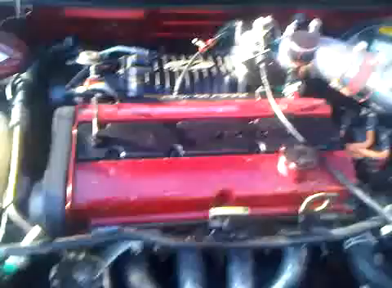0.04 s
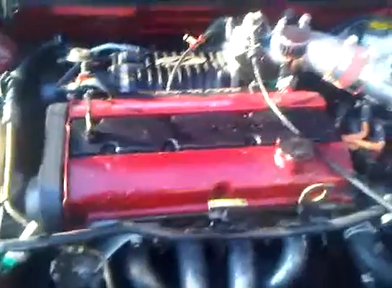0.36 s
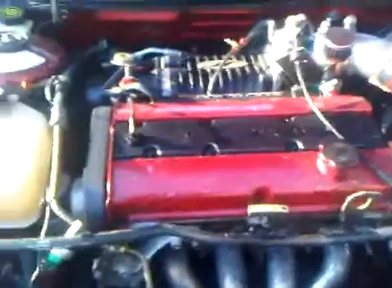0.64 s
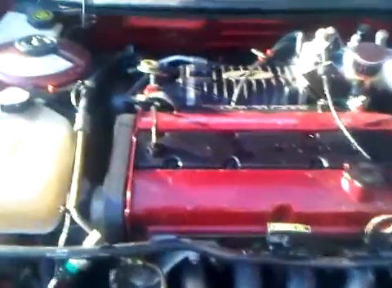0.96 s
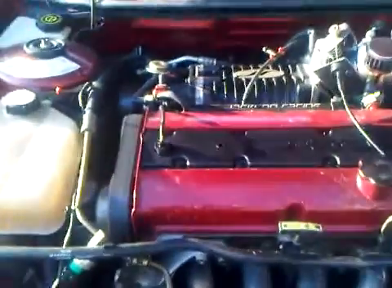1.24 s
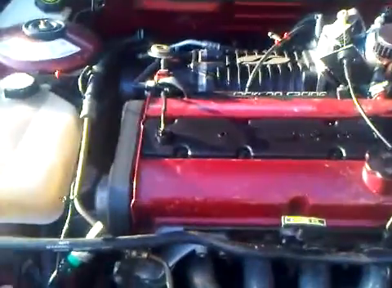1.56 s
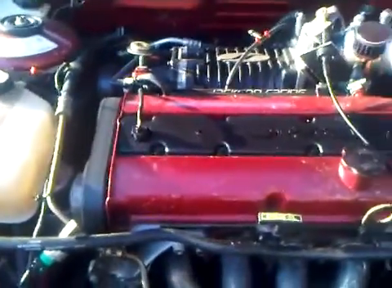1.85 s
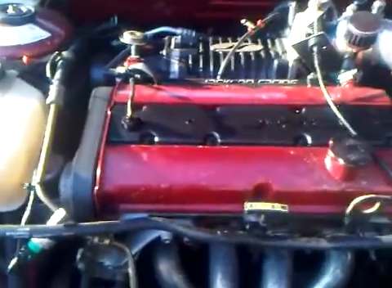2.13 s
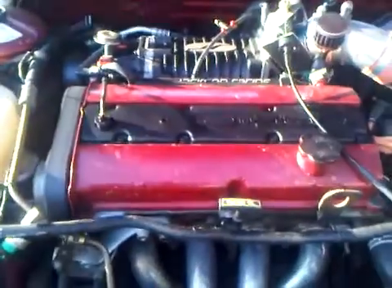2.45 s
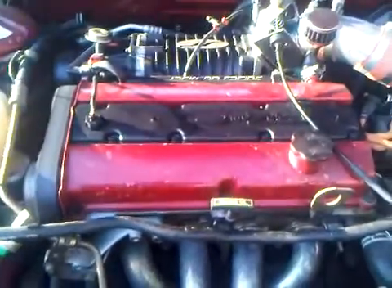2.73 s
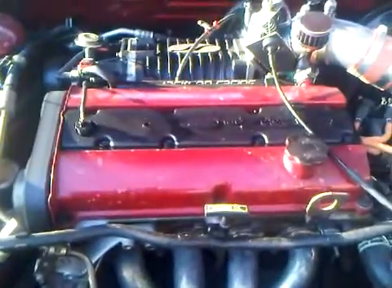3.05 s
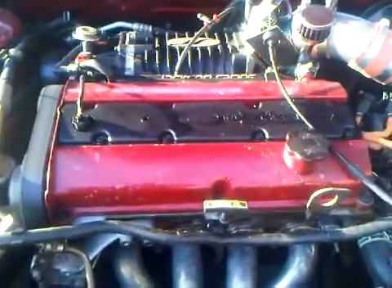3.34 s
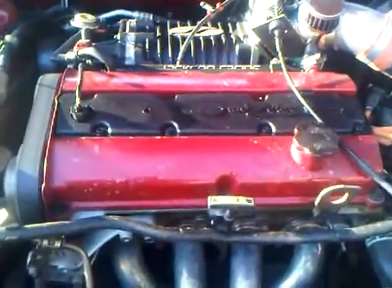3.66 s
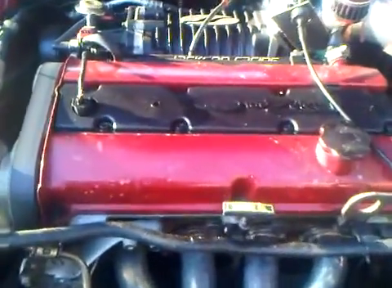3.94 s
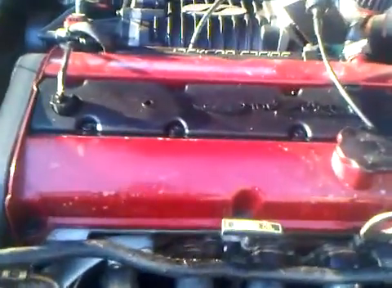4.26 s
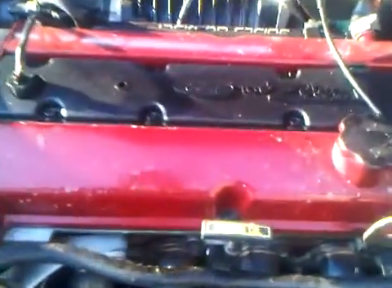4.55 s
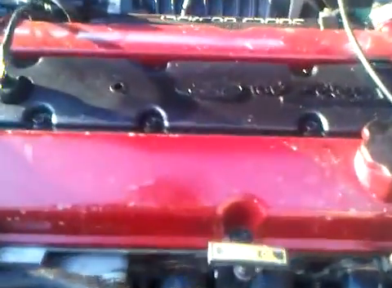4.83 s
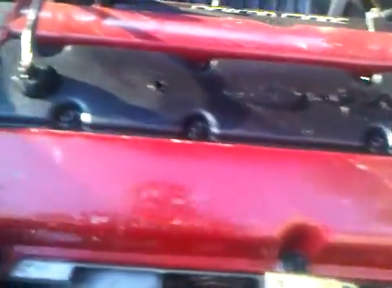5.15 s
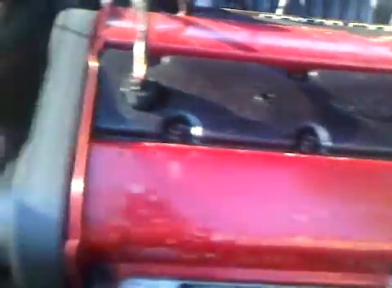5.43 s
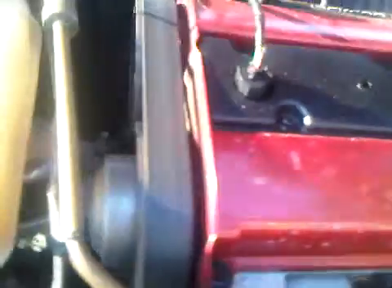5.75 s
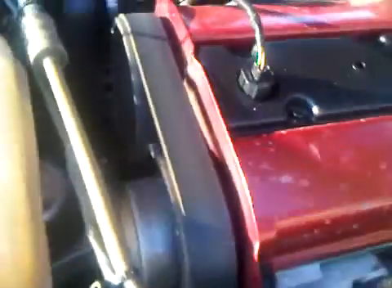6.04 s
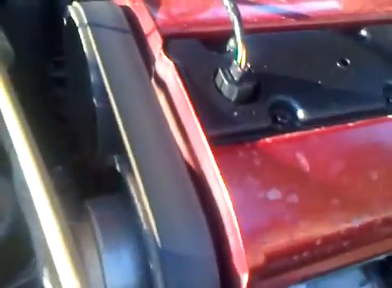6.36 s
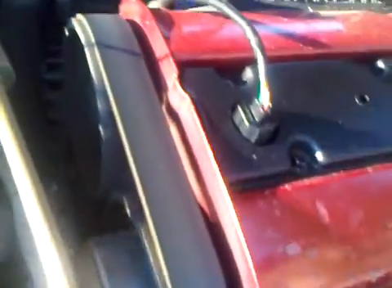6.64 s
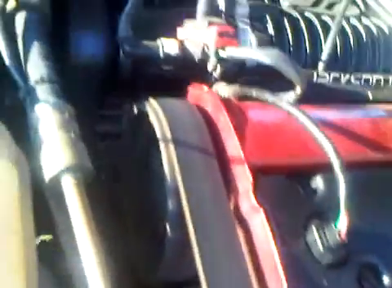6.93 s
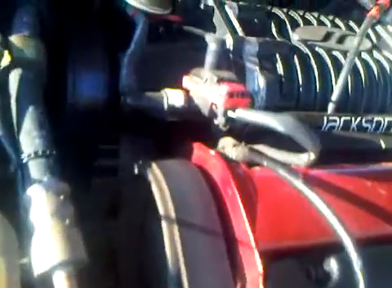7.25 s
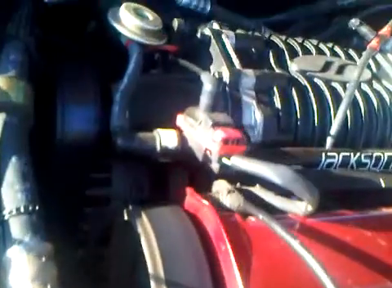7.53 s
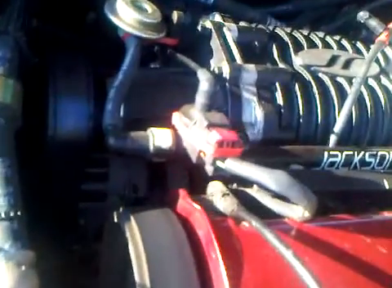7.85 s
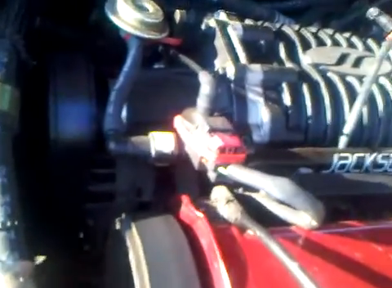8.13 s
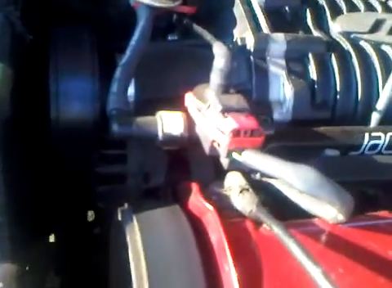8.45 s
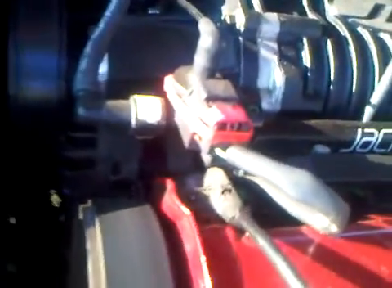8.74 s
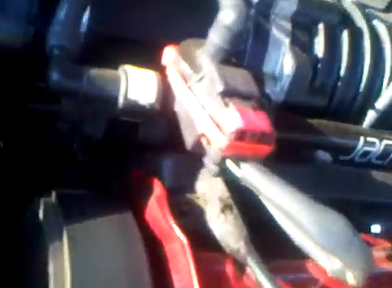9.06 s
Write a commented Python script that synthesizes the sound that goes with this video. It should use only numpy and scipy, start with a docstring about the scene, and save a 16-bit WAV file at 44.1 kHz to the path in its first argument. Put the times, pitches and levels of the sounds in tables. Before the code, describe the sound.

At about 0.2 seconds the microphone comes on with a low pop, followed at 0.3 seconds by one sharp snap. From the pop onward, a four-cylinder petrol engine idles close by, outdoors with the bonnet open, its speed wavering only slightly. Valve ticks and clacks repeat in a fast, regular pattern, mixed with small knocks, soft thuds and short dry belt slaps. Underneath are a low firing hum and the rush and whirr of belts and pulleys. The sound is bright at first and turns abruptly a little duller at about 2.5 seconds. The microphone stays over the cam cover until around 4 seconds, then moves to the belt end by about 7 seconds. The hum shifts in tone, the fine ticking softens, and the whirring, clacks and slaps grow stronger. The idle continues until the end at about 9 seconds.

```python
"""A pop and a sharp snap as the microphone comes on, then a four-cylinder petrol engine idling at
about 940 rpm, outdoors with the bonnet open. Impacts in the valve gear excite damped resonances, so
ticks and clacks come in the same order in every cycle, among knocks, thuds and belt slaps. Beneath
them the periodic firing hums, and belt friction rushes and sets pulleys and covers whirring.
The microphone hovers over the cam cover, then moves to the belt end."""
import sys
import numpy as np
from scipy import signal
from scipy.fft import rfft, irfft, next_fast_len
from scipy.io import wavfile
from scipy.ndimage import uniform_filter1d

SR = 44100
rng = np.random.default_rng(int(sys.argv[2]) if len(sys.argv) > 2 else 0)


def dump(signal):
    """Clip the signal to [-1, 1] and save it as 16-bit WAV at the path in sys.argv[1]."""
    limited = np.clip(np.atleast_2d(signal).T, -1, 1)
    pcm = np.round(limited * 32767).astype(np.int16)
    wavfile.write(sys.argv[1], SR, pcm)


N = 400869
TIME = np.arange(N) / SR

# crankshaft speed, hunting a little at idle: time_s, speed_rpm
IDLE_SPEED = [(0, 936.5), (.64, 934.6), (1.43, 945.4), (2.1, 931.3), (2.89, 941.9), (3.43, 935.3),
              (4.39, 948.4), (4.54, 932.7), (5.63, 923.2), (5.9, 943.4), (6.73, 935.5), (7.24, 950.7),
              (8.25, 932.8), (9.09, 945.1)]
# valve strokes of each cylinder in turn: tick_db, tick_tilt_db_per_octave, clack_db
VALVE_STROKES = [(3.5, 8.5, 0.5), (-1, -2.5, -12), (2.5, 2, -5.5), (0, -7.5, -13)]
# Cover and belt levels hold over the cam cover and at the belt end respectively.
# modes of each kind of impact: pitch_hz, width_hz, decay_s, cover_db, belt_db
TICK_RING = [(4330, 560, 0.0032, -40, -45.5), (5300, 810, 0.0032, -47, -50),
             (6700, 2900, 0.002, -42.5, -51)]
BOUNCE_RING = [(5370, 800, 0.0019, -33.5, -46.5)]
CLACK_RING = [(1860, 800, 0.012, -43, -41.5), (2354, 330, 0.011, -49.5, -40.5),
              (3790, 380, 0.0088, -47.5, -38), (4430, 1700, 0.0079, -45, -39)]
THUD_RING = [(148.7, 35, 0.013, -48.5, -56)]
SLAP_RING = [(2000, 1100, 0.0049, -46, -35.5)]
# knocks of block and covers in each cycle: start_s, pitch_hz, width_hz, decay_s, cover_db, belt_db
BLOCK_KNOCKS = [(.0155, 1006, 250, .005, -39.5, -47), (0.0177, 1300, 166, 0.0077, -43.5, -30),
                (0.0231, 1270, 199, .0034, -32.5, -49.5), (.0374, 4640, 110, 0.0058, -69.5, -33.5),
                (.0712, 959, 120, .014, -44, -38.5), (0.117, 318, 51.2, 0.0094, -54.5, -40)]
# belt slaps in each cycle: start_s, level_db
BELT_SLAPS = [(.0092, 1), (0.0422, -5.5), (0.06, 0.5), (.0725, 3.5), (0.124, -3)]
# harmonics of the cam speed in the firing hum: multiple, cover_db, belt_db
HUM_HARMONICS = [(8, -60, -58.5), (12, -62, -62.5), (16, -59, -63), (18, -66, -62), (20, -57.5, -61),
                 (24, -71, -69.5), (36, -71, -68), (40, -62, -55.5), (44, -70.5, -62.5), (48, -68.5, -58.5),
                 (56, -67, -67.5), (60, -63.5, -64.5), (76, -64, -58.5)]
# standing waves in the bay, passed by the microphone: centre_s, half_length_s, multiple, gain_db
STANDING_WAVES = [(4.2, 0.27, 16, 4.5), (4.2, 0.23, 20, -12), (5.397, 0.46, 20, 3), (5.4, 0.56, 40, 6.5),
                  (6.696, 0.63, 56, 7), (7.2, 0.27, 20, -6)]
# noise spectrum of belts and air: frequency_hz, cover_db_per_hz, belt_db_per_hz
RUSH_SPECTRUM = [(25, -87.5, -89), (80, -89.5, -81), (220, -85, -81), (380, -80, -72), (624, -75.5, -72.5),
                 (670, -84, -75.5), (1060, -75.5, -73), (1500, -79, -72), (1850, -78.5, -71.5),
                 (2195, -88.5, -78), (2970, -86.5, -83), (4440, -87, -82.5), (5620, -89, -84),
                 (7780, -97.5, -89)]
# resonances of pulleys and covers: pitch_hz, width_hz, cover_db_per_hz, belt_db_per_hz
WHIRR_MODES = [(252, 69, -83, -75.5), (321, 31.6, -82.5, -67.5), (829, 72, -97.5, -69.5),
               (938, 113, -69.5, -70), (978, 39, -76.5, -59.5), (1233, 106, -76.5, -67),
               (1365, 41, -68.5, -76.5), (1988, 64, -73.5, -87.5), (3770, 56, -85.5, -80.5),
               (4640, 150, -93, -77)]
# microphone path: time_s, place (0 over the cam cover, 1 at the belt end)
MIC_PATH = [(0, 0.17), (1.1, 0.2), (2.2, 0.11), (2.9, 0.077), (4.0, 0.1), (5.3, 0.42), (6.1, 0.52),
            (7.1, 0.8), (9.09, 0.89)]
# the microphone leans in and out: time_s, gain_db
MIC_CLOSENESS = [(.3, -1.4), (1.1, -0.5), (2.2, 0.46), (2.9, 0), (6.2, 0.6), (7.1, 0.3), (7.8, -0.36),
                 (9.09, 0.6)]
# the switch-on pop and its small after-bump: start_s, height
SWITCH_ON_STEPS = [(.1734, 0.54), (0.1982, 0.046)]

CYCLE_S = 120 / np.mean([rpm for _, rpm in IDLE_SPEED])   # four firings, two crank turns, one cam turn


def valve_gear(cam, place, first_tick_s=0.0058, bounce_after_s=0.0037, clack_after_s=0.0068):
    """Impact and rebound: each cylinder ticks, then clacks; the first one's loose valve strikes again."""
    beats_s = first_tick_s + CYCLE_S * np.arange(len(VALVE_STROKES)) / len(VALVE_STROKES)
    tick_db, tilt_db, clack_db = np.transpose(VALVE_STROKES)
    ticks = impacts(cam, place, list(zip(beats_s, tick_db, tilt_db)), TICK_RING)
    bounce = impacts(cam, place, [(first_tick_s + bounce_after_s, 0, 0)], BOUNCE_RING)
    clack_hits = [(s + clack_after_s, level_db, 0) for s, level_db in zip(beats_s, clack_db)]
    return ticks + bounce + impacts(cam, place, clack_hits, CLACK_RING)


def block(cam, place, first_thud_s=0.036):
    """Structural resonance: a thud with every crank turn, and knocks that each ring their own part."""
    thuds = impacts(cam, place, [(first_thud_s, 0, 0), (first_thud_s + CYCLE_S / 2, 0, 0)], THUD_RING)
    return thuds + sum(impacts(cam, place, [(s, 0, 0)], [mode]) for s, *mode in BLOCK_KNOCKS)


def belt_slaps(cam, place):
    """Heavily damped impacts: the belt gives short dry slaps, loudest at the belt end."""
    return impacts(cam, place, [(s, level_db, 0) for s, level_db in BELT_SLAPS], SLAP_RING)


def firing_hum(cam, place, waver_db=0.7, waver_hz=2.2, throb=0.01):
    """Periodic firing gives a harmonic series; uneven combustion modulates the high harmonics most."""
    out, half_turns = np.zeros(N), np.arange(0, 80, 0.5)
    for multiple, cover_db, belt_db in HUM_HARMONICS:
        swell_db = waver_db * np.log2(multiple / 4) * drift(waver_hz)   # per octave over the firing rate
        for centre_s, half_length_s, harmonic, gain_db in STANDING_WAVES:
            if harmonic == multiple:
                swell_db += gain_db * np.exp(-np.minimum(np.abs(TIME - centre_s) / half_length_s, 10) ** 2)
        unevenness = np.interp(cam, half_turns, rng.standard_normal(len(half_turns)))
        surge = unit_rms(1 + throb * multiple * unevenness)
        tone = np.sqrt(2) * np.sin(2 * np.pi * (multiple * cam + rng.random()))
        out += heard_from(place, cover_db, belt_db) * from_db(swell_db) * surge * tone
    return out


def belt_friction(cam, place, throb=0.093, throb_turn=0.1, repeat=0.22):
    """Forced vibration: friction noise rushes and drives pulleys and covers; each firing tugs at it."""
    unit_density = np.sqrt(SR / 2)   # brings unit noise to 0 dB per Hz
    tug = unit_density * (1 + throb * np.cos(2 * np.pi * 4 * (cam - throb_turn)))
    friction = tug * cyclic_noise(cam, repeat)
    rush_hz, over_cover_db, at_belt_db = np.transpose(RUSH_SPECTRUM)
    out = (1 - place) * colour(friction, rush_hz, over_cover_db)
    out += place * colour(friction, rush_hz, at_belt_db)
    for hz, width_hz, cover_db, belt_db in WHIRR_MODES:
        whirr = resonate(tug * cyclic_noise(cam, repeat), hz, width_hz)
        out += whirr * heard_from(place, cover_db, belt_db)
    return out


def switch_on_pops(swing_hz=120, damping_hz=137):
    """Step response: a voltage step through the microphone's bass cut gives an edge and a swing back."""
    edges = np.zeros(N)
    for start_s, height in SWITCH_ON_STEPS:
        edges[round(start_s * SR)] = height
    radius = np.exp(-np.pi * damping_hz / SR)
    feedback = [1, -2 * radius * np.cos(2 * np.pi * swing_hz / SR), radius ** 2]
    return signal.lfilter([1, -1], feedback, edges + 1e-18 * TIME)


def snap(start_s=0.279, height=0.12, hz=4670, width_hz=3200):
    """Impulse response of a broad resonance: one bright click that dies within a few swings."""
    click = resonate(np.arange(N) == round(start_s * SR), hz, width_hz)
    return height * click / np.abs(click).max()


def impacts(cam, place, hits, modes, attack_s=0.001, spread_db=1.0, jitter_s=0.00037, evenness=0.65):
    """Damped ringing: hits (start_s, level_db, tilt_db_per_octave) rattle each mode in every cycle."""
    out, strokes = np.zeros(N), []
    for start_s, level_db, tilt_db in hits:
        phase = cam - start_s / CYCLE_S + 1
        turn = phase.astype(int)
        force, slip = rng.standard_normal((2, 100))   # one value of each per cam turn
        age_s = np.maximum((phase - turn) * CYCLE_S - jitter_s * np.abs(slip)[turn], 0)
        rise = (1 - np.exp(-age_s / attack_s)) * from_db(level_db + spread_db * force)[turn]
        strokes.append((age_s, rise, tilt_db))
    for hz, width_hz, decay_s, cover_db, belt_db in modes:
        octaves = np.log2(hz / modes[0][0])
        energy = sum((rise * np.exp(-age_s / decay_s) * from_db(tilt_db * octaves)) ** 2
                     for age_s, rise, tilt_db in strokes)
        repeat = 700 / (700 + hz)   # low thuds repeat more exactly than bright ticks
        ringing = resonate(cyclic_noise(cam, repeat), hz, width_hz)
        power = uniform_filter1d(ringing ** 2, int(SR / width_hz)) + 1e-12
        even_ringing = unit_rms(ringing / np.sqrt(power) ** evenness)
        out += np.sqrt(energy) * even_ringing * heard_from(place, cover_db, belt_db)
    return out


def cyclic_noise(cam, repeat):
    """Partly periodic noise: a share of its power recurs each cam turn, as the same surfaces meet."""
    turn_samples = int(N / (cam[-1] - cam[0]))
    surface = rng.standard_normal(SR)[(cam % 1 * turn_samples).astype(int)]
    return np.sqrt(repeat) * surface + np.sqrt(1 - repeat) * rng.standard_normal(N)


def resonate(x, hz, width_hz):
    """Two like resonators in cascade: steep skirts and unit gain at the peak."""
    r = np.exp(-np.pi * width_hz / np.sqrt(np.sqrt(2) - 1) / SR)
    gain = (1 - r * r) / 2
    section = [gain, 0, -gain, 1, -2 * r * np.cos(2 * np.pi * hz / SR), r * r]
    return signal.sosfilt([section, section], x + 1e-18)


def colour(x, hz, level_db):
    """Spectral shaping by a gain curve interpolated over log frequency."""
    size = next_fast_len(N)
    bins_hz = np.maximum(np.arange(size // 2 + 1) * SR / size, 1)
    gain = from_db(np.interp(np.log(bins_hz), np.log(hz), level_db))
    return irfft(rfft(x, size) * gain, size)[:N]


def heard_from(place, cover_db, belt_db):
    """Level depends on position: a part's gain between the cam cover and the belt end."""
    return from_db(cover_db + place * (belt_db - cover_db))


def drift(hz):
    """Slow random modulation of spread about 1, with hz new values a second."""
    return np.interp(TIME * hz, np.arange(1000), rng.standard_normal(1000))


def in_time(rows):
    """Linear interpolation of rows (time_s, value) at every sample."""
    return np.interp(TIME, *np.transpose(rows))


def from_db(db):
    """Decibels to amplitude ratio."""
    return 10 ** (np.asarray(db) / 20)


def unit_rms(x):
    """Normalisation to unit mean power."""
    return x / np.sqrt(np.mean(x ** 2) + 1e-20)


def scene():
    """Superposition of the engine's sources at the moving microphone, from the moment it comes on."""
    cam = np.cumsum(in_time(IDLE_SPEED)) / (120 * SR)   # camshaft angle in turns
    place = in_time(MIC_PATH)
    engine = valve_gear(cam, place) + block(cam, place) + belt_slaps(cam, place)
    engine += firing_hum(cam, place) + belt_friction(cam, place)
    treble = colour(engine, hz=[1600, 2300], level_db=[-40, 0])
    treble_db = in_time([(2.396, 4), (2.506, 0)])   # bright at first, then abruptly duller
    engine += (from_db(treble_db) - 1) * treble
    switched_on = in_time([(0.165, 0), (0.172, 0.2), (0.178, 1)])
    engine *= from_db(in_time(MIC_CLOSENESS)) * switched_on
    return (engine + switch_on_pops() + snap())[None]


def record(dry):
    """Band limiting: the microphone's response falls away above 7 kHz."""
    roll_off = signal.cheby1(6, 0.5, 7250, fs=SR, output="sos")
    steep_cut = signal.cheby2(12, 30, 9100, fs=SR, output="sos")
    return signal.sosfilt(steep_cut, signal.sosfilt(roll_off, dry))


dry = scene()
out = record(dry)
dump(out)
```